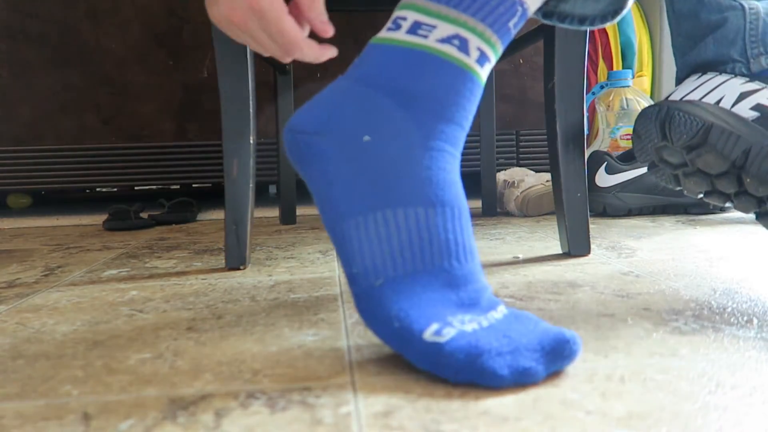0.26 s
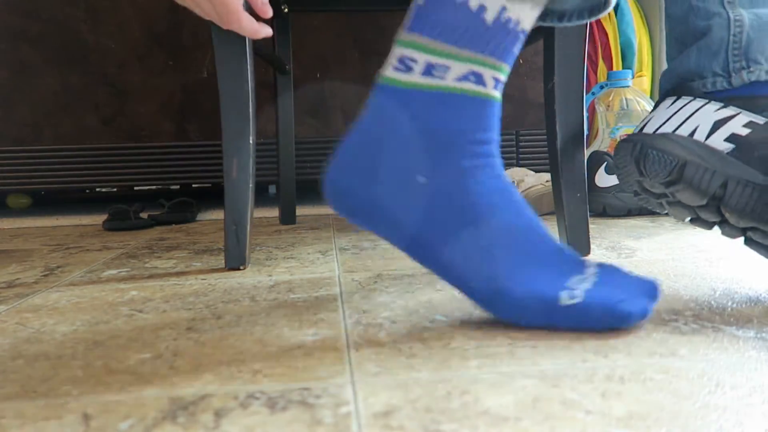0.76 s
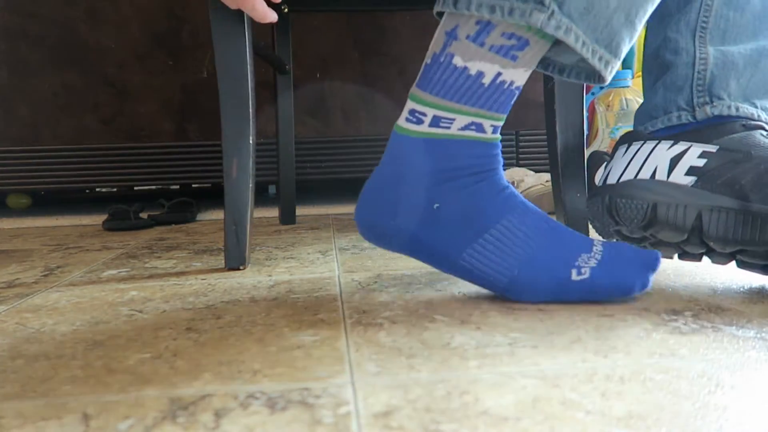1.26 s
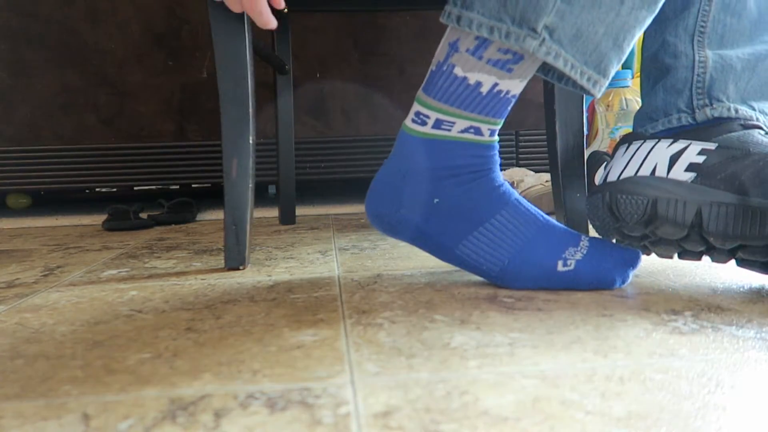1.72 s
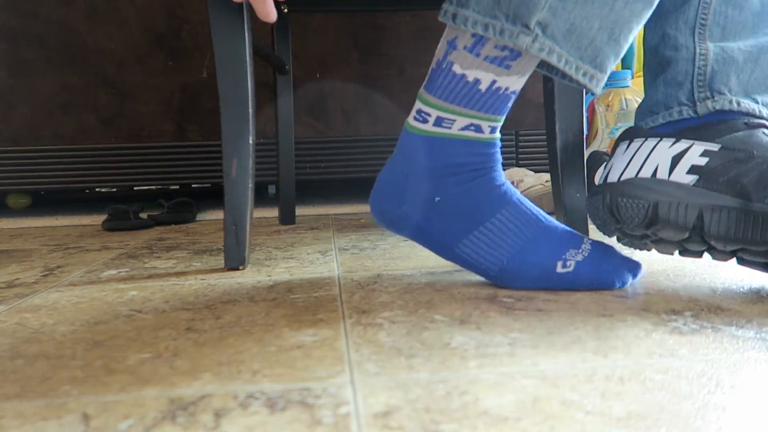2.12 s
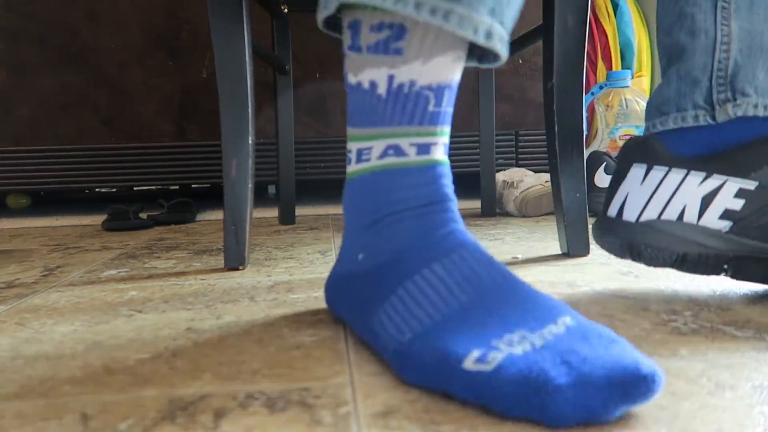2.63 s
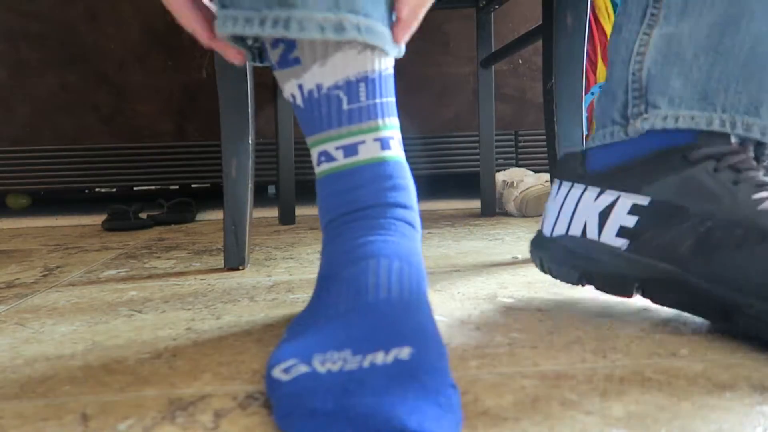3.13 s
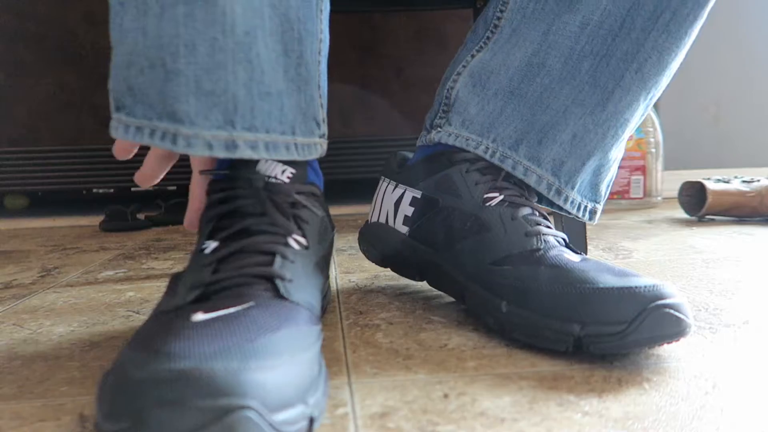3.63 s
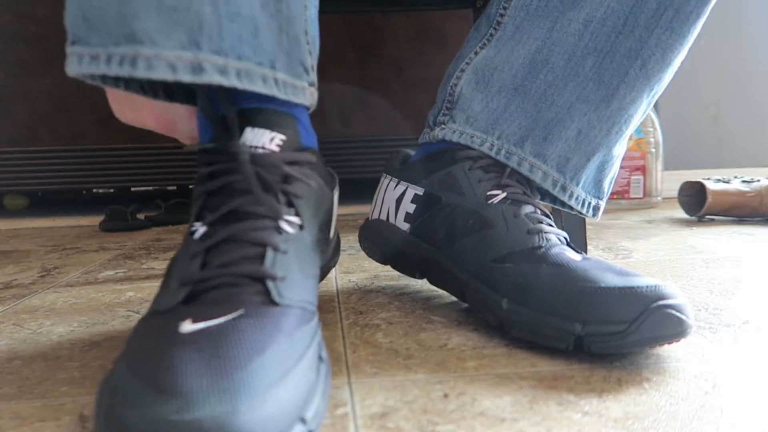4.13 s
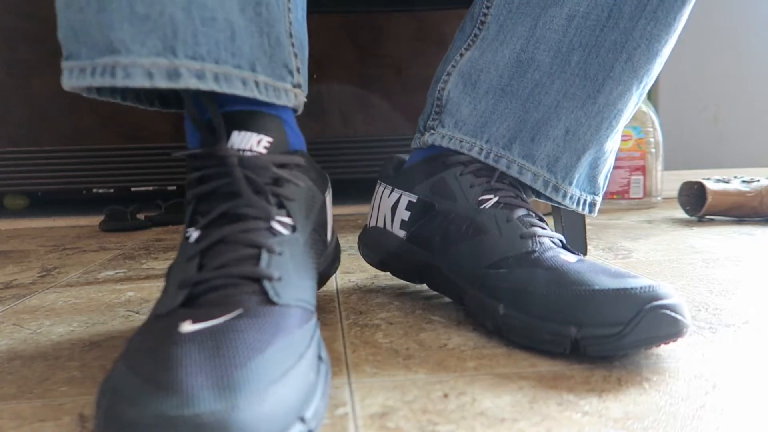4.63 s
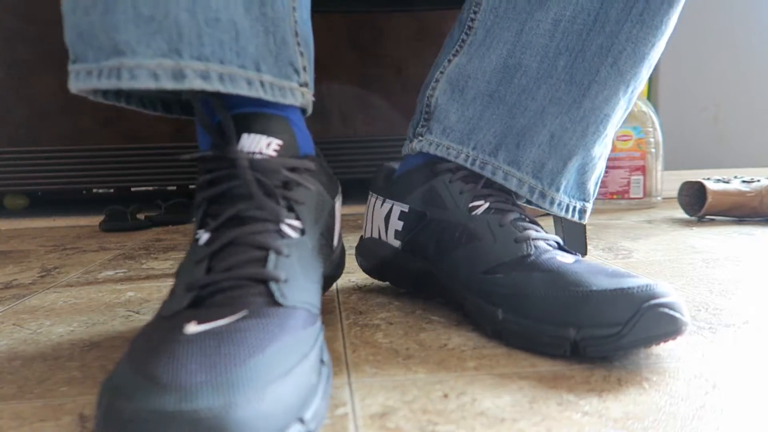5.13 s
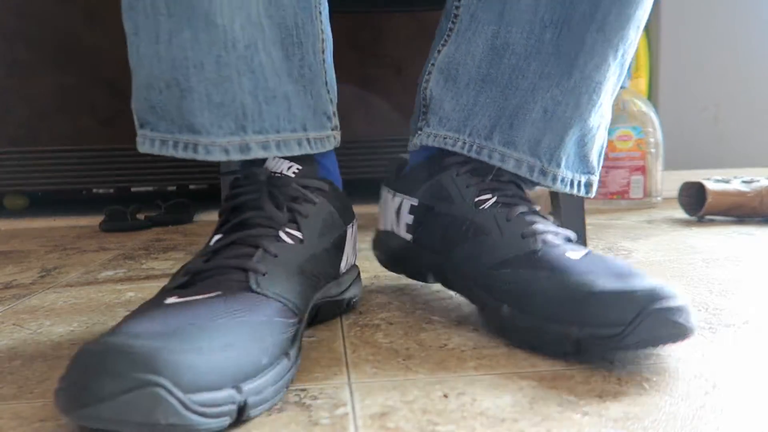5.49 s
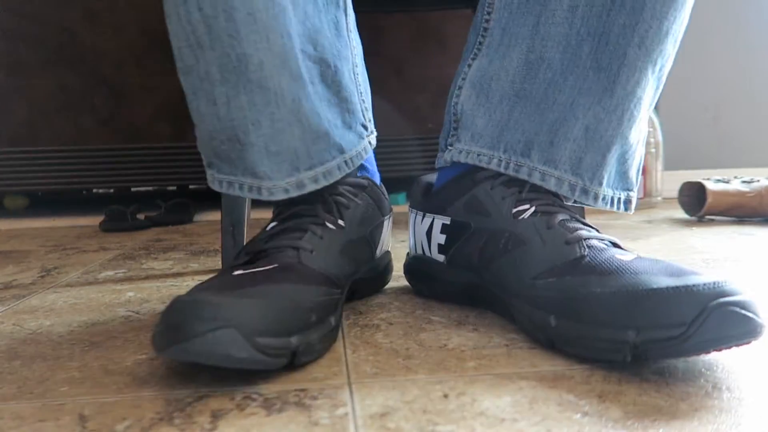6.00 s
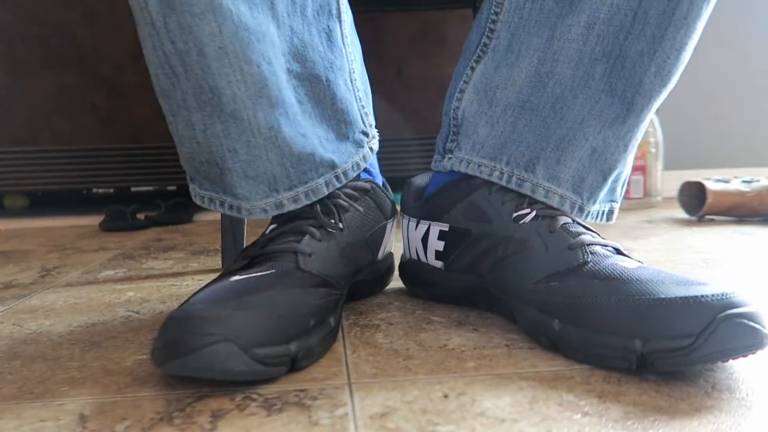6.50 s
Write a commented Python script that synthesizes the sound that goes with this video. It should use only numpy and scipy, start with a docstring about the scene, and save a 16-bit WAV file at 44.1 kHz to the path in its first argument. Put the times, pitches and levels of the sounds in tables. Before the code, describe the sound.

Heard very close to a tile floor indoors: quiet sock and jeans rubbing, a deep muffled footfall with a scrape, a stronger swish of denim, and a hollow shoe knock. Dry lace-like ticks follow, then a single slap, a cluster of hard rubber slaps with low thuds, and last light knocks. A mains hum and faint air continue beneath, with short room reverberation.

```python
"""A shoe pushed onto a foot knocks hollowly, then both shoes slap a tile floor, heard close by at floor level.
Knocks are decaying rings with a shell rattle; slaps are sharp pushes with a patter of tread noise.
Socks and jeans rustle as coloured noise swelling with each stroke; soles scuff in sinking resonant noise.
Swelling low sines thud in the floor over a rumble, and dry noise cracks tick.
An appliance hums at the mains frequency over steady air noise in the small room."""
import sys
import numpy as np
from scipy import signal
from scipy.fft import rfft, irfft, next_fast_len
from scipy.io import wavfile
from scipy.ndimage import map_coordinates

SR = 44100
rng = np.random.default_rng(int(sys.argv[2]) if len(sys.argv) > 2 else 0)


def file_out(sig):
    """Save sig as 16-bit WAV at sys.argv[1]."""
    # one column per channel
    cols = np.atleast_2d(sig).T
    # limit, then scale
    lim = np.clip(cols, -1, 1)
    pcm = np.round(lim * 32767).astype(np.int16)
    wavfile.write(sys.argv[1], SR, pcm)


N = 297675

# Colour of a rubber sole before tilting: f/Hz, level/dB
SOLE_SPECTRUM = [(30, -9), (180, 7.5), (350, 8.5), (540, 4.5), (800, 1), (1150, -3.5), (1500, -5),
                 (2100, -12), (2600, -14), (3200, -37), (5000, -55), (9000, -64), (12000, -52),
                 (16000, -61)]
# Stereo width of near sources: f/Hz, left-right likeness (1 = mono)
CLOSE_LIKENESS = [(60, .999), (250, .95), (700, 0.9), (2200, 1), (4200, 0.92), (8000, 0.24), (13000, 0.5)]


def amp(db):
    """Decibels to gain."""
    return 10 ** (np.asarray(db) / 20)


def unit(x):
    """Scale to rms 1."""
    return x / np.sqrt(np.mean(x ** 2) + 1e-20)


def along(points, hz):
    """Read (f/Hz, value) points along a log frequency axis."""
    f, value = np.transpose(points)
    return np.interp(np.log(hz + 1), np.log(f + 1), value)


def wobble(rate):
    """A random curve of straight segments, rate knots a second."""
    knots = rng.standard_normal(int(N * rate / SR) + 4)
    return map_coordinates(knots, [np.arange(N) * rate / SR], order=1)


def filtered(x, response):
    """Apply a response of frequency to x."""
    n = x.shape[-1]
    size = next_fast_len(n + 8192)
    spectrum = rfft(x, size) * response(np.fft.rfftfreq(size, 1 / SR))
    return irfft(spectrum, size)[..., :n]


def resonance(f, hz, width):
    """The response of a causal band-pass at hz, width in Hz."""
    return 1j * f * width / (hz * hz - f * f + 1j * f * width)


def impulse(gain, size=4096):
    """The minimum-phase pulse with a given gain over frequency, scaled to peak 1."""
    cepstrum = irfft(np.log(gain(np.fft.rfftfreq(size, 1 / SR)) + 1e-6))
    # folding the cepstrum onto positive time makes the pulse causal
    folded = 2 * cepstrum[:size // 2] * (np.arange(size // 2) > 0)
    pulse = irfft(np.exp(rfft(folded, size)))
    return pulse / np.abs(pulse).max()


def noise(gain, size=N, alike=CLOSE_LIKENESS):
    """Coloured stereo noise of rms 1; mid and side shares set its left-right likeness over frequency."""
    def mid_side_gain(f):
        turn = np.arccos(np.clip(along(alike, f), -1, 1)) / 2
        return gain(f) * np.array([np.cos(turn), np.sin(turn)])

    mid, side = filtered(rng.standard_normal((2, size)), mid_side_gain)
    return unit(np.array([mid + side, mid - side]))


def rush(spectrum, alike=CLOSE_LIKENESS):
    """Stereo noise of rms 1, coloured by a (f/Hz, level/dB) spectrum."""
    return noise(lambda f: amp(along(spectrum, f)), alike=alike)


def add(track, s, sound):
    """Mix a sound into a track at s seconds."""
    part = track[..., round(s * SR):][..., :sound.shape[-1]]
    part += sound[..., :part.shape[-1]]


def appliance(mains_hz=60, hum_db=-35, air_db=-47):
    """A mains hum whose fundamental sinks now and then under wavering overtones, over steady room air."""
    # Overtones of the hum: multiple of the mains frequency, level/dB
    overtones = [(2, -44.5), (3, -58), (4, -62.5)]
    # The deep hum sinks and returns: middle t/s, half length/s, depth/dB
    hum_dips = [(0.0, 0.27, 13), (1.12, 0.18, 16), (4.33, 0.69, 14.5), (5.787, 0.51, 5.5), (6.8, 0.21, 9)]
    # Colour of the room air: f/Hz, level/dB
    air_spectrum = [(20, -35), (40, -3), (80, 0.5), (150, -8.5), (280, -4), (380, -10), (490, -11),
                    (800, -17.5), (2000, -26.5), (5000, -34), (14000, -48.5)]
    # Stereo width of sound from all round: f/Hz, left-right likeness
    diffuse_likeness = [(60, .999), (110, 0.89), (170, 0.31), (300, 0.021), (1000, 0.022), (4000, 0.046),
                        (13000, 0.082)]

    t = np.arange(N) / SR
    phase = 2 * np.pi * mains_hz * t
    sink_db = sum(depth * np.exp(-((t - s) / half) ** 4) for s, half, depth in hum_dips)
    hum = amp(hum_db - sink_db) * np.cos(phase)
    for multiple, db in overtones:
        hum += amp(db + 0.6 * wobble(4.8)) * np.cos(multiple * phase)
    air = amp(air_db) * rush(air_spectrum, diffuse_likeness)
    return np.sqrt(2) * hum + air  # the root of 2 makes the hum levels rms


def cloth(sock_db=-1, denim_db=0.5, fibre_db=0, catch_db=1.03, grain_db=2.0):
    """Each stroke swells and dies away; threads catch and let go, so that the rubbing is grainy."""
    # A leg or hand moves and cloth slides, levels before the layer trims above:
    # t/s at its fastest, denim level/dB, rise/s, fall/s, sock rubbing/dB re denim, fibre hiss/dB re denim
    strokes = [(.1, -53.5, 0.062, 0.074, -14, -8), (.59, -55.5, 0.21, 0.12, 5, -5),
               (.785, -52.5, 0.037, 0.079, 9.5, -8), (1.0, -52, 0.096, 0.077, -20, -12),
               (1.192, -53, 0.068, 0.062, 9, -1), (1.36, -56.5, .04, 0.096, 0, -10),
               (1.52, -55.5, 0.067, 0.07, -1.5, -8.5), (1.71, -51, 0.079, 0.049, 2.5, -8.5),
               (1.93, -62, 0.14, 0.045, 7.5, -9), (2.35, -53, .16, 0.11, 0.5, -20),
               (2.48, -44.5, 0.059, 0.12, 1, -13.5), (2.97, -40, 0.16, 0.3, -11.5, -12.5),
               (3.075, -36, 0.059, 0.041, -0.5, -23), (3.169, -47, 0.068, 0.21, -6, -15),
               (3.59, -44, 0.19, 0.047, -1, -8.5), (3.66, -51, 0.071, 0.13, 10, -13.5),
               (4.06, -47.5, 0.17, 0.1, 2, -13), (4.28, -51, 0.093, 0.052, 9.5, -12),
               (4.37, -51.5, 0.089, 0.095, -4, -14), (4.65, -56.5, 0.077, 0.032, 8.5, -15),
               (4.84, -54, 0.16, 0.09, 10.5, -11.5), (5.06, -51, 0.059, 0.088, 4.5, -12),
               (5.42, -48, 0.17, 0.092, -2.5, -12.5), (5.53, -46, 0.064, 0.1, 8.5, -12),
               (5.67, -48, 0.017, 0.09, 9.5, -11.5), (5.85, -48, 0.036, 0.25, 3, -15),
               (6.2, -50, .07, 0.23, -3, -10.5), (6.33, -55, 0.046, 0.072, 17, -20),
               (6.721, -57, 0.17, 0.12, 3, -9)]
    # Colours of the three rubbing layers: f/Hz, level/dB
    sock_spectrum = [(120, -5), (250, -8.5), (480, 5), (650, -4.5), (850, -3.5), (1200, -10.5), (2000, -12),
                     (5000, -55)]
    denim_spectrum = [(400, -7), (900, -0.5), (1400, -1), (2300, 0.5), (2800, -0.5), (3400, -4.5),
                      (4300, -7.5), (5200, -13), (7000, -20), (10000, -29.5), (16000, -45)]
    fibre_spectrum = [(2500, -25), (4500, -2.5), (6000, -9), (9000, -8.5), (11500, -3), (12500, -4.5),
                      (14000, -16), (16000, -25)]
    stroke_shape = 1.35  # 1 = pointed swell, 2 = bell

    t = np.arange(N) / SR
    # denim never lies quite still; its fidget carries sock and fibre at levels re denim
    fidget = amp(-69 + 1 * wobble(6))
    fidget_sock_db, fidget_fibre_db = 2, -22
    power = np.outer(amp([fidget_sock_db, 0, fidget_fibre_db]), fidget) ** 2
    for s, db, rise, fall, rub_db, hiss_db in strokes:
        distance = np.abs((t - s) / np.where(t < s, rise, fall))
        speed = np.exp(-distance ** stroke_shape)
        power += np.outer(amp([db + rub_db, db, db + hiss_db]), speed) ** 2
    sock_level, denim_level, fibre_level = np.sqrt(power)

    rubbing = amp(sock_db) * sock_level * rush(sock_spectrum)
    rubbing += amp(denim_db) * denim_level * rush(denim_spectrum)
    rubbing += amp(fibre_db) * fibre_level * rush(fibre_spectrum)
    catching = unit(amp(catch_db * wobble(60) + grain_db * wobble(700)))
    return catching * rubbing


def floor(rumble_db=0, right_db=1.5):
    """Footfalls bend the floor for a few cycles and stir fixed modes; shifting weight keeps it rumbling."""
    # The floor gives under a foot:
    # t/s, level/dB, f/Hz of the bend at that spot, swell time/s, fixed modes' level/dB re the bend
    thud_events = [(.06, -29.5, 99, 0.011, -9), (1.352, -32, 97, 0.027, -22),
                   (2.428, -12.5, 57.3, 0.024, -20), (2.463, -21.5, 165, .016, -5),
                   (2.488, -8.5, 61, 0.019, -24), (2.537, -17.5, 61, .03, -34),
                   (3.28, -28, 141.4, 0.012, -2.5), (3.567, -23, 94, 0.012, -6.5),
                   (5.079, -19, 71.4, 0.02, -18.5), (5.336, -20.5, 86.5, 0.014, -20.5),
                   (5.524, -19, 75.5, 0.0092, -26), (5.668, -13, 150, 0.0058, -6),
                   (5.675, -15, 66, .011, -21), (5.757, -27, 176, .013, -9), (5.821, -12.5, 78, 0.015, -4),
                   (5.833, -16, 37.7, 0.026, -19), (6.03, -31.5, 229, 0.014, -6),
                   (6.191, -20, 70, 0.015, -6.5), (6.327, -20.5, 121, 0.016, -3.5),
                   (6.361, -20, 89, 0.0088, -18)]
    # Fixed modes of the floor: f/Hz, level/dB, swell time/s
    floor_modes = [(149.6, -5, .022), (205.4, -7, 0.019), (281.3, -2, .012)]
    # Weight shifting on the floor: t/s, rumble level/dB
    shifting = [(0.0, -45), (.3, -52.5), (1.1, -55), (2.05, -54), (2.75, -46.5), (3.05, -41), (3.35, -46),
                (3.68, -39.5), (3.87, -50), (4.8, -46), (5.25, -55.5), (5.75, -44), (5.88, -33.5),
                (6.05, -53), (6.3, -42), (6.55, -53)]
    # Colour of the rumble: f/Hz, level/dB
    rumble_spectrum = [(18, -22), (35, 11.5), (60, 5.5), (90, 4), (120, 8.5), (155, 4.5), (200, 4),
                       (280, 3), (450, -37.5)]

    out, t = np.zeros((2, N)), np.arange(SR // 3) / SR

    def bend(hz, swell):
        """A sine that swells to its peak at the swell time, then dies."""
        return (t / swell * np.exp(1 - t / swell)) ** 3 * np.sin(2 * np.pi * hz * t)

    modes = sum(amp(db) * bend(hz, swell) for hz, db, swell in floor_modes)
    modes = modes * amp([[-right_db], [right_db]])  # the modes lean right
    for s, db, hz, swell, modes_db in thud_events:
        add(out, s, amp(db) * (bend(hz, swell) + amp(modes_db) * modes))
    shift_db = np.interp(np.arange(N) / SR, *np.transpose(shifting))
    return out + amp(shift_db + rumble_db) * rush(rumble_spectrum)


def knocks(rattle_db=0, rattle_t60=0.24, rattle_tilt_db=-2.5, right_db=1):
    """The main ring depends on where the shoe is struck and how the foot fills it; the stiff shell rattles along."""
    # The hollow shoe knocks:
    # t/s, level/dB before the lean right, main ring f/Hz, its t60/s, rise time constant/s,
    # gain/dB of shell and rattle re main ring
    knock_events = [(.049, -31, 203, 0.17, 0.0033, -32), (0.061, -21, 430, 0.031, 0.0016, -30),
                    (3.283, -19.5, 295, 0.12, 0.0033, -26), (3.326, -18, 525, 0.037, 0.00032, -14.5),
                    (3.424, -28.5, 286, 0.085, 0.0022, -15.5), (3.566, -8, 457.4, 0.077, 0.009, -21.5),
                    (3.623, -21.5, 510, 0.076, 0.00065, -10.5), (3.667, -30, 504, 0.075, 0.0045, -1),
                    (3.708, -29.5, 1324, 0.12, 0.00076, -7.5), (3.725, -29.5, 524, 0.11, 0.0044, -10),
                    (4.28, -29.5, 484, 0.05, 0.0031, -12), (5.006, -31.5, 445, 0.095, 0.0018, -24),
                    (6.154, -18.5, 519, 0.068, 0.0012, -11.5), (6.182, -16.5, 444.5, 0.12, 0.0071, -11),
                    (6.22, -18.5, 475, 0.081, 0.0024, -13.5), (6.317, -17.5, 259.6, 0.15, 0.0012, -12),
                    (6.344, -28.5, 330, 0.11, 0.0017, -13), (6.394, -30, 548, 0.15, 0.0014, -14)]
    # Modes of the shoe shell before they are halved and varied: f/Hz, level/dB, t60/s
    shell_modes = [(450, 7, 0.12), (723, 2.5, 0.057), (744, 5.5, 0.063), (1250, 8.5, 0.03),
                   (1730, -2, 0.051), (2350, -4, 0.02)]

    out, t = np.zeros((2, N)), np.arange(SR // 3) / SR

    def ring(hz, t60):
        """A dying sine."""
        return np.sin(2 * np.pi * hz * t) * amp(-60 * t / t60)

    def padded(f):
        """The sole's colour with the treble dulled by the lining."""
        return amp(along(SOLE_SPECTRUM, f) + rattle_tilt_db * np.log2(1 + f / 1000))

    for s, db, main_hz, main_t60, rise, shell_db in knock_events:
        # each knock meets the shell at another spot: random lift in dB and relative pitch shift
        spots = rng.normal(0, [2.5, .025], (len(shell_modes), 2))
        shell = np.zeros(len(t))
        for (hz, level, t60), (lift, shift) in zip(shell_modes, spots):
            shell += amp(level + lift) * rng.choice([-1, 1]) * ring(hz * (1 + shift), t60)
        rattle = noise(padded, size=len(t)) * amp(rattle_db - 60 * t / rattle_t60)
        body = ring(main_hz, main_t60) + amp(shell_db) * (shell / 2 + rattle)
        add(out, s, amp(db) * (1 - np.exp(-t / rise)) * body)
    return out * amp([[-right_db], [right_db]])


def scuffs(slip_db=-0.5, judder_db=0.7, grit_life_s=0.0014):
    """Short slides: uneven slips and caught grit in one broad resonance that sinks as the slide slows."""
    # Soles, socks and hems slide, levels before slips and grit:
    # t/s, level/dB, starting centre f/Hz, starting width/Hz of each of two passes, rise/s, fall/s
    slides = [(.36, -63.5, 4830, 1820, 0.18, 0.066), (1.163, -48, 695, 1000, .001, 0.012),
              (1.216, -44, 1650, 1800, 0.0009, 0.017), (2.1, -53, 3570, 1400, 0.24, 0.12),
              (2.275, -48.5, 9900, 4000, 0.013, .012), (2.415, -39, 740, 450, 0.0021, 0.028),
              (2.442, -31, 1970, 2700, 0.0014, 0.027), (2.841, -42, 4550, 1090, 0.12, 0.087),
              (2.99, -34, 2250, 1110, 0.091, 0.016), (3.694, -49, 3000, 1800, 0.0018, 0.0065),
              (3.707, -37, 2380, 1000, .002, .011), (4.6, -48, 840, 450, .28, .03),
              (5.004, -36.5, 700, 346, 0.039, 0.028), (5.391, -42, 1870, 1400, .017, 0.15),
              (5.705, -38, 1850, 1000, .005, 0.021), (5.7543, -35.5, 1800, 1300, .001, 0.015),
              (5.895, -34.5, 1800, 1190, 0.023, 0.022), (6.154, -41, 1300, 1410, 0.031, 0.065),
              (6.395, -45, 900, 870, .001, 0.022)]
    sag_per_s = 0.94  # exponential rate at which a slide slows
    grit_per_s, grit_db = 200, 5  # grain rate, and weight of the grain pulses (each peaks at 1/e)

    out, t = np.zeros((2, N)), np.arange(SR // 2) / SR
    travel = np.cumsum(np.exp(-sag_per_s * t)) / SR
    for s, db, hz, width, rise, fall in slides:
        stroke = np.minimum(t / rise, 1) * np.exp(-np.maximum(t - rise, 0) / fall)
        rub = noise(lambda f: resonance(f, hz, width) ** 2, size=len(t))
        # reading the noise ever slower makes its resonance sink
        slowing = np.array([np.interp(travel, t, side) for side in rub])
        add(out, s, amp(db) * stroke * slowing)

    caught = rng.random(N) < grit_per_s / SR
    grain = t / grit_life_s * np.exp(-t / grit_life_s)
    grit = signal.fftconvolve(caught, grain)[:N]
    slips = amp(slip_db * wobble(500) + judder_db * wobble(120))
    return out * unit(slips * (1 + amp(grit_db) * grit))


def ticks(breadth=0.48):
    """Tiny dry cracks of band-passed noise, gone in a hundredth of a second."""
    # Lace tips, grit and seams click: t/s, peak level/dB, f/Hz
    clicks = [(1.2163, -33.5, 2070), (1.775, -37.5, 1460), (1.95, -46, 5000), (2.441, -25, 5300),
              (3.6195, -39, 9000), (3.6234, -24.5, 3830), (4.046, -33, 1710), (4.056, -29, 1190),
              (4.07, -29.5, 2520), (4.083, -30, 1300), (4.099, -29, 1650), (5.077, -40, 10700),
              (5.079, -32, 3080), (5.2118, -40, 2480), (5.2345, -35.5, 1460), (5.3226, -30, 3820),
              (5.405, -27, 7700), (5.6614, -36, 9400), (5.832, -40, 8400), (6.124, -35.5, 1180),
              (6.315, -29.5, 3720)]

    out, t = np.zeros((2, N)), np.arange(SR // 20) / SR
    fade = amp(-60 * t / .011)  # t60 in s
    for s, db, hz in clicks:
        crack = noise(lambda f: resonance(f, hz, breadth * hz) ** 2, size=len(t)) * fade
        add(out, s, amp(db) * crack / np.abs(crack).max())
    return out


def slaps(rebound=0.36, rebound_s=0.00066):
    """A sole lands as one sharp push and springs back; its tread blocks patter down just after."""
    # Rubber soles meet tile:
    # t/s, level/dB, tilt/dB per octave (250 to 4000 Hz), tread patter energy/dB re the push, patter t60/s
    landings = [(3.624, -16.5, 12, -6, 0.032), (5.079, -8.5, -1, -7, 0.042), (5.334, -22.5, -1, 1.5, 0.032),
                (5.5221, -3, 2.5, -6, 0.028), (5.6674, -12.5, 3, 6.5, 0.026),
                (5.821, -15.5, 3, 12.5, 0.018), (5.8236, -14, 7.5, 12, 0.05),
                (5.835, -5.5, -4.5, -14, 0.18), (6.316, -22, 7, 8.5, 0.061)]

    out, t = np.zeros((2, N)), np.arange(SR // 4) / SR
    for s, db, tilt_db, patter_db, t60 in landings:
        push = impulse(lambda f: amp(along(SOLE_SPECTRUM, f) + tilt_db * np.log2(np.clip(f, 250, 4000))))
        contacts = noise(np.ones_like, size=len(t)) * amp(-60 * t / t60)
        contacts *= amp(patter_db) / np.linalg.norm(contacts[0])
        contacts[:, 0] += 1  # the landing itself
        contacts[:, round(rebound_s * SR)] -= rebound
        add(out, s, amp(db) * signal.fftconvolve(contacts, push[None], axes=1))
    return out


def nearby(x):
    """Close surfaces send back single echoes that ripple the colour of the sound."""
    # Echoes off legs, chair and couch: delay/s, gain re direct sound
    near_echoes = [(.0031, 0.056), (.0058, 0.14), (0.0122, 0.14)]

    def ripple(f):
        return 1 + sum(gain * np.exp(-2j * np.pi * f * delay) for delay, gain in near_echoes)

    return filtered(x, ripple)


def room(x, delay=.006):
    """The walls answer after delay seconds with a short diffuse tail that fades at its own rate in each band."""
    # Reverberation of the small room: f/Hz, t60/s
    decay_times = [(100, 0.8), (300, 0.25), (1000, 0.38), (3000, 0.11), (12000, 0.096)]
    # Stereo width of the walls' answer: f/Hz, left-right likeness
    echo_likeness = [(100, 1), (300, 0.78), (1000, 1), (4000, 1), (12000, .15)]

    burst = noise(np.ones_like, size=SR // 2, alike=echo_likeness)
    hz, t, bands = signal.stft(burst, SR, nperseg=256)
    fade = amp(-60 * t / along(decay_times, hz)[:, None])
    tail = signal.istft(bands * fade, SR, nperseg=256)[1]
    tail = np.pad(tail / np.linalg.norm(tail[0]), ((0, 0), (round(delay * SR), 0)))
    return signal.fftconvolve(x, tail, axes=1)[:, :N]


def scene(room_db=-15, boom_db=-17):
    """Shoes, cloth and floor in the humming room; room_db and boom_db send shoes and thuds to the walls."""
    hum, rustle, thuds = appliance(), cloth(), floor()
    shoes = knocks() + scuffs() + ticks() + slaps()
    reverb = room(amp(room_db) * shoes + amp(boom_db) * thuds)
    return nearby(shoes + rustle) + thuds + reverb + hum


def record(dry):
    """The microphone has a narrow dip in the treble, and a steep low-pass sets the band limit."""
    notch_hz, notch_width_hz, notch_depth = 12950, 500, .9
    top_hz = 15250
    coloured = filtered(dry, lambda f: 1 - notch_depth * resonance(f, notch_hz, notch_width_hz))
    return filtered(coloured, lambda f: 1 / (1 + (f / top_hz) ** 120))


dry = scene()
out = record(dry)
file_out(out)
```